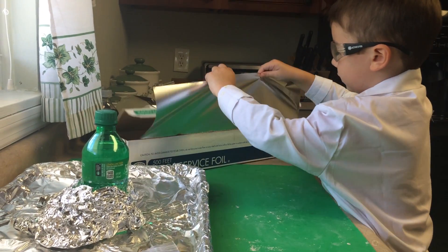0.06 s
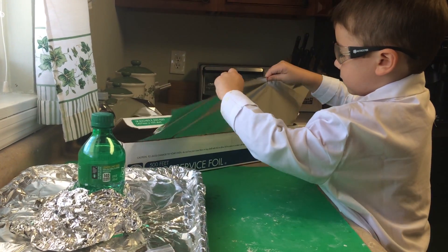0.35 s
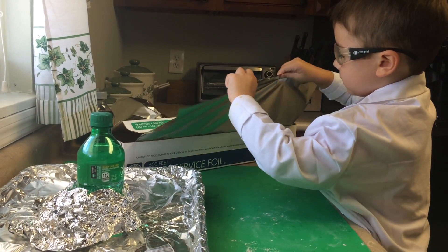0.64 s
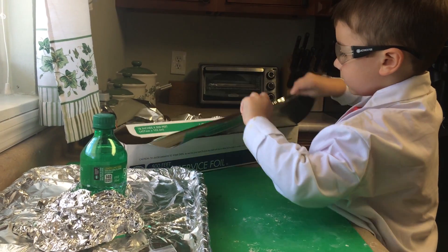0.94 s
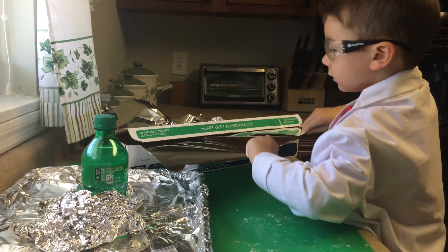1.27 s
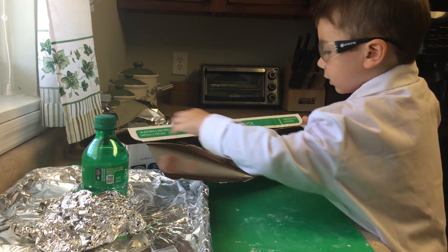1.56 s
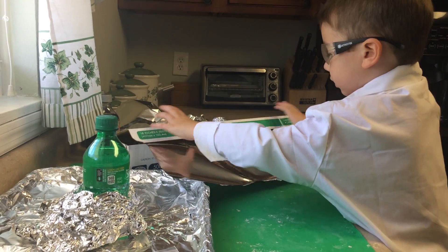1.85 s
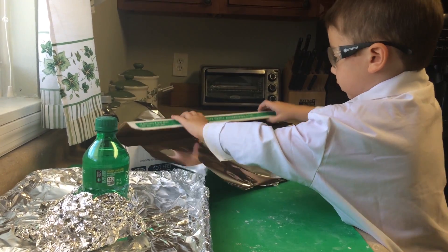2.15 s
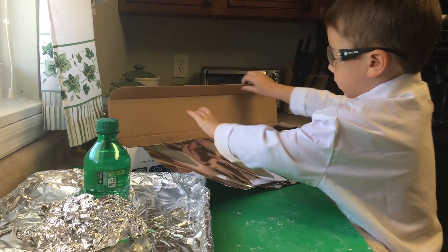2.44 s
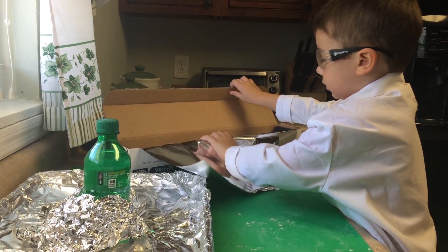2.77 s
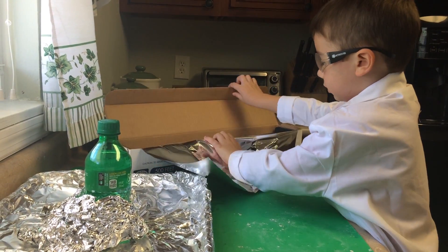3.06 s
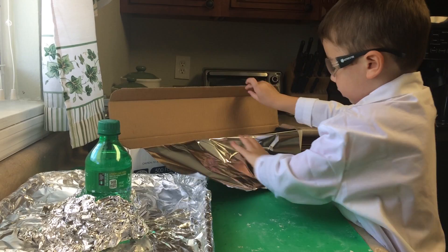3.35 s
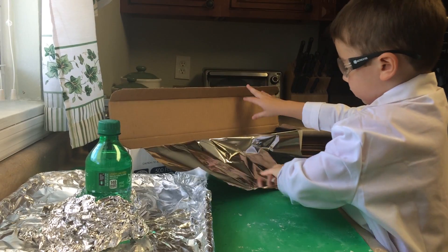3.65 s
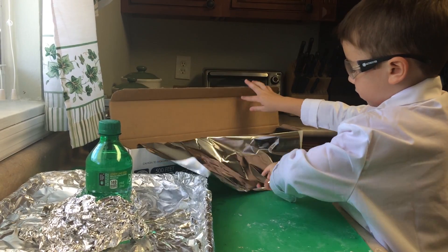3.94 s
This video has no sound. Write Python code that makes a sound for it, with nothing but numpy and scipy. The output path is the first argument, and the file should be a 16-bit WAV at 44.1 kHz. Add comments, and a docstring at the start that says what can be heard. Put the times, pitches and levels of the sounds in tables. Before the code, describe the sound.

Aluminum foil crackles close to the microphone as it is pulled off a roll that scrapes and knocks in its cardboard box. The sheet is torn, the lid lifts, and the foil is smoothed flat in a small kitchen.

```python
"""Aluminium foil at a kitchen table, heard close up on one microphone in a small, hard room.
First the sheet is pulled off its roll, which scrapes and knocks in the ringing cardboard box.
At 1 s it is torn at the box's edge, at 2 s the lid lifts, and from 2.7 s the foil is smoothed flat.
All along it buckles in thousands of tiny clicks and some sharp snaps, each smeared by the room;
a faint mains hum lies underneath."""
import sys
import numpy as np
from scipy import signal
from scipy.io import wavfile
from scipy.ndimage import uniform_filter1d

SR = 44100
rng = np.random.default_rng(int(sys.argv[2]) if len(sys.argv) > 2 else 0)


def put_to_file(sound):
    """Save the sound as 16-bit audio at rate SR, in the file named by the first command-line argument."""
    columns = np.atleast_2d(sound).T  # one column per channel
    safe = np.clip(columns, -1, 1)
    whole_steps = np.round(safe * 32767)
    wavfile.write(sys.argv[1], SR, whole_steps.astype(np.int16))


N = 176400

# The foil's spectrum from close by (frequency [Hz], relative level [dB])
FOIL_COLOUR = [(90, -59), (150, -11), (420, -22), (530, -6.5), (900, -16), (1250, -6.5), (2200, -3),
               (4000, 1.5), (7000, -0.5), (10500, -6.5), (15000, -12)]
# Hands on the sheet, one curve per movement (time [s], level [dB], relative treble [dB])
PULL = [
    [(0.0, -14.5, -7), (0.026, -35, -8), (0.048, -29.5, -8), (0.078, -42, -5), (0.096, -26, -9.5),
     (0.146, -49, -14), (0.154, -43, -2), (0.188, -36, -10)],
    [(0.196, -33, -10), (0.204, -27, -10), (0.268, -30.5, -13.5), (0.306, -55, -6), (0.338, -31.5, -10.5),
     (0.38, -54, -10), (0.4, -48, 3)],
    [(0.41, -31, -7), (0.498, -30.5, -10.5), (0.522, -24, -12), (0.564, -29, -13), (0.614, -25.5, -12),
     (0.628, -28, -10), (0.822, -24, -6), (0.85, -36, -7)],
]
TEAR = [
    [(1.01, -41, -12), (1.036, -24, -1.5), (1.108, -30.5, -11.5), (1.152, -22.5, -7.5), (1.188, -34.5, -6),
     (1.216, -23, 0), (1.306, -26.5, -10), (1.34, -37, -7), (1.37, -48, -19)],
    [(1.38, -44, -11), (1.388, -25.5, -14), (1.44, -35.5, -10), (1.46, -20.5, -14), (1.528, -18, -1),
     (1.644, -32.5, -13), (1.666, -30.5, -10), (1.886, -59.5, -25.5), (1.95, -56, -18)],
]
LIFT_LID = [
    [(2.01, -67, 4), (2.026, -44, -20), (2.034, -27, -15), (2.084, -28, -9), (2.162, -17, -3),
     (2.262, -28, -10), (2.28, -23, -4.5), (2.394, -39, -18.5), (2.424, -43.5, -13), (2.488, -41, -14.5),
     (2.57, -49, -22)],
]
SMOOTH = [
    [(2.72, -74, -2), (2.73, -53, -13), (2.75, -24, -11.5), (2.82, -18.5, -5.5), (2.966, -33, -10.5),
     (2.998, -27, -9.5), (3.094, -35.5, -18.5), (3.102, -52, 12), (3.14, -26, -14)],
    [(3.312, -33, -7), (3.32, -30, -14.5), (3.422, -24.5, -9), (3.504, -39, -14), (3.524, -42, -9),
     (3.586, -55, -19), (3.618, -35.5, -11), (3.716, -74, -29), (3.78, -71, -13)],
    [(3.8, -67, -9), (3.808, -51.5, -16), (3.852, -51, -8), (3.9, -23, -7.5), (3.972, -39, -16),
     (4.0, -36, 0)],
]
HANDLING = [*PULL, *TEAR, *LIFT_LID, *SMOOTH]
LEAD_S = 0.0083  # crinkle and rub run this far ahead of their curves

def crinkle(t):
    """Dense tiny buckles follow the hands; sharper creases are brighter."""
    when, _, treble_db = np.vstack(HANDLING).T
    tilt = 0.76 * (np.interp(t + LEAD_S, when, treble_db) + 7)  # no tilt at a treble of -7 dB
    buckles = clicks(per_s=2200, spread_db=5) * follow(HANDLING, t + LEAD_S)
    return amp(-1.5) * radiate(buckles, FOIL_COLOUR, tilt)


def avalanches(t, events, colour):
    """A crease gives way at once and sets off a dying run of clicks."""
    force, tilt = np.zeros(N), np.zeros(N)
    for start, db, decay_s, tilt_db in events:
        run = slice(*np.searchsorted(t, [start, start + 10 * decay_s]))
        force[run] += amp(db) * np.exp(-(t[run] - start) / decay_s)
        tilt[run] = tilt_db
    grit = unit(sizes(spread_db=3))
    return radiate(force * grit, colour, tilt)


# Runs of collapsing creases (time [s], level [dB], decay [s], tilt [dB/octave])
CRUNCHES = [(0.1986, -15, 0.011, -1), (0.3311, -21, 0.0068, -5), (0.4076, -16.5, 0.0067, 0),
            (0.585, -17.5, 0.0089, 5), (0.778, -15, 0.0059, 6), (0.8607, -8, 0.022, 2),
            (0.873, -7.5, 0.0029, 2), (1.213, -15, 0.0064, -8), (1.4566, -10.5, 0.014, 5.5),
            (1.515, -11.5, 0.011, -8), (1.66, -14, 0.0055, -2), (2.029, -13, 0.0098, 2.5),
            (2.271, -10.5, 0.01, -0.5), (2.584, -20.5, 0.014, -1), (2.605, -24.5, 0.022, -3.5),
            (2.7296, -20, 0.008, -2), (2.786, -9.5, 0.0094, 4.5), (2.9963, -16, 0.0073, 8),
            (3.078, -19, 0.0054, -1), (3.1485, -10.5, 0.018, -0.5), (3.344, -13.5, 0.0054, 4),
            (3.3937, -11, 0.007, 2), (3.521, -19, 0.0096, -0.5), (3.879, -18, 0.0056, -9.5),
            (3.897, -8.5, 0.0063, 0.5)]

def crunches(t, spots):
    """Creases collapse together where a hand grips or the sheet crumples, and the room answers."""
    return amp(-8.5) * kitchen(avalanches(t, CRUNCHES, FOIL_COLOUR), spots, wander_s=0.0012)


def stray_ticks(t, per_s=35, decay_s=0.00038, tilt_db=2.5):
    """Small snaps at chance moments, growing with the handling up to a limit."""
    times = t[rng.random(N) < per_s / SR]
    scatter_db = rng.uniform(-5.5, 5, len(times))
    handling_db = 20 * np.log10(follow(HANDLING, times) + 1e-9)
    levels = np.minimum(handling_db, -26.5) + 9 + scatter_db
    return [(start, db, decay_s, tilt_db) for start, db in zip(times, levels)]


# A snap's spectrum (frequency [Hz], relative level [dB])
SNAP_COLOUR = [(100, -30), (500, -18), (1000, -10), (2000, -4), (4000, 1.5), (7000, 0.5), (10500, -6),
               (15000, -10)]
# Sharp snaps near the microphone (time [s], level [dB], decay [s], tilt [dB/octave])
SNAPS = [(0.051, -14.5, 0.0011, 1.5), (0.157, -22, 0.0012, 2.5), (0.52, -12, 0.0014, 3.5),
         (0.614, -17, 0.0013, 2), (0.6679, -16, 0.0015, 4.5), (0.8155, -15, 0.0013, 3),
         (0.982, -18.5, 0.0011, 2.5), (1.0092, -13, 0.0013, 3), (1.035, -14, 0.0013, 3),
         (1.329, -19.5, 0.0013, 3), (2.821, -7.5, 0.0013, 4), (2.866, -12, 0.0013, 2.5),
         (2.9144, -11.5, 0.0013, 2.5), (3.2109, -5, 0.0012, 3)]

def snaps(t, spots):
    """Single creases flip over and echo in the room, too small to radiate bass."""
    flips = avalanches(t, [*stray_ticks(t), *SNAPS], SNAP_COLOUR)
    in_room = kitchen(flips, spots, wander_s=0.0002, wet_db=-0.5)
    return signal.sosfilt(signal.butter(2, 680, "high", fs=SR, output="sos"), in_room)


# Scraped cardboard's spectrum (frequency [Hz], relative level [dB])
RUB_COLOUR = [(50, -21), (80, -2.5), (120, -18.5), (200, -7.5), (300, -4.5), (420, -7.5), (560, -4),
              (800, -4), (1400, -2), (2200, -3), (4000, -31), (12000, -32)]
# Scraping in the box, one curve per stroke (time [s], level [dB])
RUB_STROKES = [
    [(0.0, -23), (0.042, -39.5), (0.1, -33), (0.108, -42), (0.185, -38.5)],
    [(0.195, -31.5), (0.227, -30.5), (0.237, -33), (0.285, -46), (0.333, -34.5), (0.355, -46),
     (0.39, -35.5)],
    [(0.41, -35), (0.502, -33), (0.53, -26), (0.544, -30.5), (0.776, -26), (0.856, -38.5), (0.872, -26),
     (0.96, -63)],
    [(1.01, -38.5), (1.038, -33.5), (1.2, -43.5), (1.212, -23), (1.25, -47), (1.346, -42), (1.512, -37.5),
     (1.6, -51)],
    [(2.02, -65), (2.036, -33), (2.058, -59), (2.114, -29), (2.152, -35.5), (2.158, -34), (2.268, -68),
     (2.3, -54)],
    [(2.735, -47), (2.743, -28), (2.769, -41), (2.773, -43), (2.829, -31), (2.841, -57), (2.937, -46),
     (2.95, -46)],
]

def rub(t):
    """Roll and sheet stick and slip against the cardboard."""
    slips = clicks(per_s=1400, spread_db=4.5) * follow(RUB_STROKES, t + LEAD_S)
    return amp(-1) * radiate(slips, RUB_COLOUR)


# Hollow knocks of the roll and the lid (time [s], level [dB], pitch [Hz])
KNOCKS = [(.199, -27.5, 309), (.235, -24.5, 562), (.462, -34, 574), (.588, -23, 498), (0.781, -25.5, 487),
          (1.398, -24, 720), (2.084, -29.5, 266), (2.100, -27.5, 575), (2.105, -39, 87), (2.111, -23, 910),
          (2.156, -26, 513), (2.822, -22.5, 588), (3.008, -25.5, 800)]

def knocks(t, decay_cycles=3.35, rise_s=0.0013):
    """Cardboard struck softly: a few cycles whose pitch depends on the panel that is hit."""
    out = 0
    for start, db, hz in KNOCKS:
        age = np.maximum(t - start, 0)
        envelope = np.exp(-age * hz / decay_cycles) * (1 - np.exp(-age / rise_s))
        out = out + amp(db) * np.sin(2 * np.pi * hz * age) * envelope
    return out


# Resonances of the box and its tube (frequency [Hz], gain [dB], time to fall 60 dB [s])
BOX_MODES = [(532, 6.5, 0.21), (719, -6.5, 0.1), (858, -1, 0.27), (960, -4.5, 0.17), (1328, -20, 0.05),
             (1385, -3, .15), (1570, -4, 0.21), (1904, -1, 0.11)]

def box(shake):
    """The box rings along with whatever shakes it."""
    out = shake
    for hz, db, t60 in BOX_MODES:
        radius = np.exp(-np.log(1000) / (t60 * SR))
        pole = radius * np.exp(2j * np.pi * hz / SR)
        out = out + amp(db) * 2 * (1 - radius) * signal.lfilter([1], [1, -pole], shake).real
    return out


# Resonances of the table top (frequency [Hz], gain [dB], time to fall 60 dB [s])
TABLE_MODES = [(161, 5.5, 0.15), (177, -6, 0.16)]
# The box bumping on the table (time [s], level [dB])
BUMPS = [(0.079, -28.5), (0.194, -43.5), (.866, -37.5), (2.084, -45)]

def bumps(t, rise_s=0.0061):
    """Dull thuds of the box ring the table top."""
    out = 0
    for start, db in BUMPS:
        age = np.maximum(t - start, 0)
        ring = sum(amp(gain_db) * np.sin(2 * np.pi * hz * age) * np.exp(-np.log(1000) * age / t60)
                   for hz, gain_db, t60 in TABLE_MODES)
        out = out + amp(db) * ring * (1 - np.exp(-age / rise_s))
    return out


# The kitchen's reverberation (frequency [Hz], time to fall 60 dB [s])
ROOM_T60 = [(200, 0.19), (550, 0.43), (1400, 0.29), (3700, 0.35), (9700, 0.19), (15000, 0.21)]
TAIL_DB = -0.5  # against the early echoes

def echoes(first_echo_s=0.001, early_decay_s=0.012):
    """From one spot on the sheet to the microphone: quick echoes off the table and a diffuse tail."""
    age = np.arange(SR // 2) / SR
    arrived = age > first_echo_s
    tail = arrived * sum(
        band(rng.standard_normal(len(age)), hz) * np.exp(-np.log(1000) * age / at(ROOM_T60, hz))
        for hz in BANDS_HZ)
    early = arrived * rng.standard_normal(len(age)) * np.exp(-age / early_decay_s)
    return amp(TAIL_DB) * tail / np.linalg.norm(tail) + early / np.linalg.norm(early)


def kitchen(direct, spots, wander_s, wet_db=0):
    """Clicks come from ever-changing spots on the wide sheet, and each spot has its own echoes."""
    width = int(wander_s * SR)
    shares = rng.standard_normal((len(spots), N))
    shares = uniform_filter1d(uniform_filter1d(shares, width), width)
    shares = shares / np.linalg.norm(shares, axis=0)
    wet = sum(signal.fftconvolve(direct * share, spot)[:N] for share, spot in zip(shares, spots))
    return (direct + amp(wet_db) * wet) / np.sqrt(2 + amp(TAIL_DB) ** 2)


# The quiet kitchen around the microphone (frequency [Hz], relative level [dB])
AIR_COLOUR = [(25, -23), (45, -7), (70, -5.5), (110, -7), (160, -6), (300, -17.5), (600, -14.5),
              (1500, -17), (1900, -14), (2300, -26), (6000, -27), (15000, -43)]

def room_tone(t, hum_hz=58.2):
    """Still air and the low hum of an appliance in the background."""
    air = amp(-53) * radiate(np.ones(N), AIR_COLOUR)
    hum = amp(-55) * np.sqrt(2) * np.sin(2 * np.pi * hum_hz * t)
    return air + hum


BANDS_HZ = 42 * 2 ** (np.arange(18) / 2)  # half-octave centres

def radiate(force, colour, tilt_db=0, pivot_hz=4500, facet_spread_db=2.5):
    """Each click rings every band with its own sign and strength, around a mean colour."""
    gains = amp(at(colour, BANDS_HZ))
    gains = gains / np.sqrt(np.sum(gains ** 2 * BANDS_HZ) / SR / np.sqrt(2))
    facets = unit(rng.choice([-1, 1], N) * amp(facet_spread_db * rng.standard_normal(N)))
    out = 0
    for hz, gain in zip(BANDS_HZ, gains):
        octaves = max(np.log2(hz / pivot_hz), -1)
        drive = force * np.roll(facets, rng.integers(N)) * amp(tilt_db * octaves)
        out = out + gain * band(drive, hz)
    return out


def clicks(per_s, spread_db):
    """Clicks at random moments; rms 1."""
    return unit((rng.random(N) < per_s / SR) * sizes(spread_db))


def sizes(spread_db):
    """Random click strengths, many small and a few large."""
    return amp(spread_db * np.clip(rng.standard_normal(N), -2, 2))


def follow(curves, t):
    """Gain of a set of level curves, silent between them."""
    return sum(amp(np.interp(t, *np.array(c).T[:2], left=-np.inf, right=-np.inf)) for c in curves)


def band(x, hz):
    """Half-octave band-pass."""
    edges = [hz * 2 ** -.25, hz * 2 ** .25]
    return signal.sosfilt(signal.butter(2, edges, "band", fs=SR, output="sos"), x + 1e-18)


def at(points, hz):
    """Read (frequency [Hz], value) points on a log-frequency axis."""
    freqs, values = np.array(points).T
    return np.interp(np.log(hz), np.log(freqs), values)


def amp(db):
    """Decibels to gain."""
    return np.exp(np.asarray(db) * (np.log(10) / 20))


def unit(x):
    """Scale to rms 1."""
    return x / np.sqrt(np.mean(x ** 2))


def scene():
    """One microphone at the table: foil and box in front, the kitchen behind."""
    t = np.arange(N) / SR
    spots = [echoes() for _ in range(8)]
    rustle = kitchen(crinkle(t) + rub(t), spots, wander_s=0.004)
    shake = rustle + crunches(t, spots) + snaps(t, spots) + knocks(t)
    return (box(shake) + bumps(t) + room_tone(t))[None]


def record(dry):
    """The recorder cuts the treble above 15.4 kHz."""
    return signal.sosfilt(signal.ellip(10, .2, 70, 15400, fs=SR, output="sos"), dry)


dry = scene()
out = record(dry)
put_to_file(out)
```